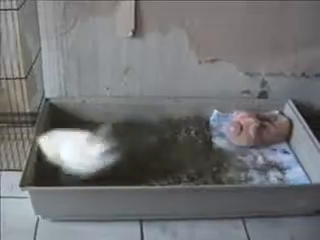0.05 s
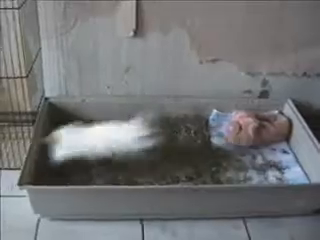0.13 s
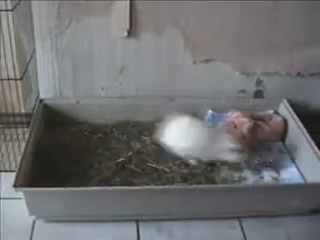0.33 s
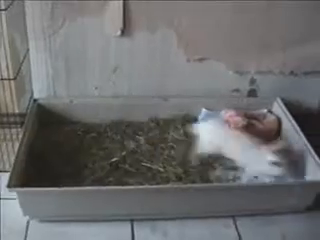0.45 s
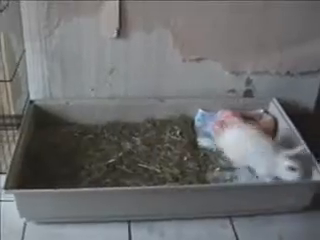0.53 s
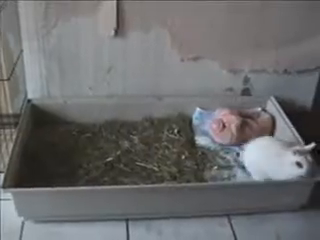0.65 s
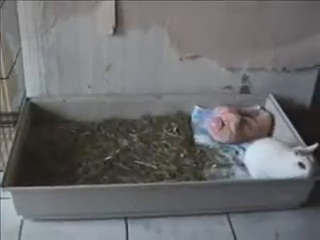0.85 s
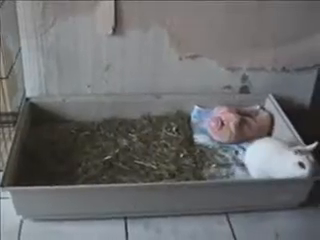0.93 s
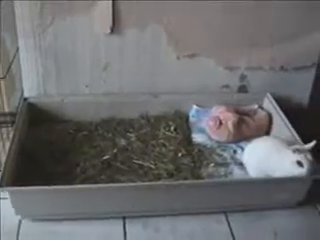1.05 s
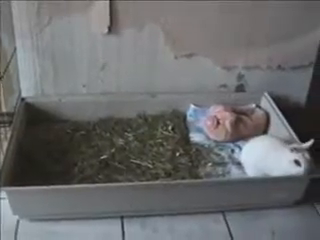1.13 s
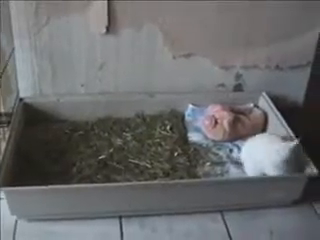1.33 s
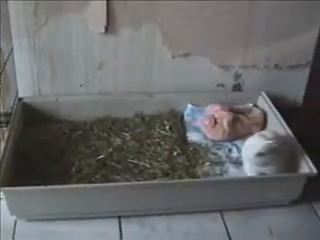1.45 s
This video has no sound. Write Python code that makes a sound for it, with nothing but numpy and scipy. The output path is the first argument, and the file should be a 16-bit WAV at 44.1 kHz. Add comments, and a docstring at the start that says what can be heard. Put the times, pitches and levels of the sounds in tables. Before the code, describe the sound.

A rabbit's loud hollow thump on a plastic tray, amid pattering paws and rustling hay

```python
"""Paws patter on a plastic cage tray and hay rustles, over an appliance hum and a faint hiss.
Stalks snap as a rabbit dashes, leaps and lands with one loud hollow thump; then it settles.
Thump and paws are decaying sine modes of the tray; hay, snaps, clatter and a claw squeak are
coloured noise, partly ticks. Hum is wavering sines. A small tiled room adds a noise tail."""
import sys
import numpy as np
from scipy import signal
from scipy.fft import rfft, irfft, next_fast_len
from scipy.io import wavfile
from scipy.ndimage import map_coordinates

SR = 44100
rng = np.random.default_rng(int(sys.argv[2]) if len(sys.argv) > 2 else 0)


def wrap_up_sound(samples):
    """Save the sound to the file named by the first command line argument, as 16-bit audio."""
    columns = np.atleast_2d(samples).T
    # keep every value between -1 and 1, then stretch to whole-number steps
    tamed = np.clip(columns, -1, 1)
    steps = np.round(tamed * 32767).astype(np.int16)
    wavfile.write(sys.argv[1], SR, steps)


N = 66150
T = np.arange(N) / SR
STALKS_PER_S = 1500  # mean tick rate

# Resonant modes of the plastic tray. Each row: frequency in Hz, relative level in dB, t60 in s,
# swell time constant after a heavy blow in s.
TRAY_MODES = [(78.5, -17.5, 0.2, 0.014), (109, -20.5, 0.33, 0.0017), (150.7, -13.5, 0.29, 0.0037),
              (185, -11.5, 0.22, 0.0022), (229.3, -0.5, 0.15, 0.0086), (268.3, 0, 0.23, 0.0099),
              (346.6, -14.5, 0.22, 0.00067), (424.7, -15, 0.36, 0.0048), (443, -20, 0.28, 0.0023),
              (483, -11.5, 0.14, 0.0055), (573.5, -4, 0.071, 0.0011), (671, -19.5, .17, .002),
              (729, -33, 0.43, .002), (1137, -25, 0.15, 0.0029)]


def amp(db):
    """Decibels to gain."""
    return 10 ** (np.asarray(db) / 20)


def unit(x):
    """Scale to rms 1."""
    return x / np.sqrt(np.mean(x ** 2) + 1e-20)


def along(points, hz):
    """Interpolate (Hz, value) points on a log frequency axis."""
    f, v = np.transpose(points)
    return np.interp(np.log(hz + 1), np.log(f + 1), v)


def filtered(x, response):
    """Multiply the spectrum of x by a response of frequency."""
    m = next_fast_len(N + SR // 2)
    return irfft(rfft(x, m) * response(np.fft.rfftfreq(m, 1 / SR)), m)[..., :N]


def spread(pair):
    """Mix two unrelated signals into left and right with a set correlation per frequency."""
    # Stereo likeness. Each row: frequency in Hz, left-right correlation (0 to 1).
    likeness = [(30, 0.77), (130, 1), (500, 0.81), (1000, 0.69), (2500, 0.65), (8000, 0.69), (15000, 0.7)]

    def mid_side_gains(hz):
        angle = np.arccos(np.clip(along(likeness, hz), 0, .998)) / 2
        return np.array([np.cos(angle), np.sin(angle)])

    mid, side = filtered(pair, mid_side_gains)
    return np.array([mid + side, mid - side])


def noise(colour, grain_share=0):
    """Coloured stereo noise of rms 1, a share of its power in single random ticks."""
    ticks = unit(rng.standard_normal((2, N)) * (rng.random(N) < STALKS_PER_S / SR))
    share = np.clip(grain_share, 0, 1)
    pair = np.sqrt(share) * ticks + np.sqrt(1 - share) * rng.standard_normal((2, N))
    return unit(filtered(spread(pair), lambda hz: amp(along(colour, hz))))


def fade(start_s, t60_s, rise_s):
    """Exponential rise times exponential decay, silent before the start."""
    t = np.maximum(T - start_s, 0)
    return (1 - np.exp(-t / rise_s)) * np.exp(-np.log(1000) * t / t60_s)


def bursts(rows, colour, rise_s, grain_share):
    """Decaying bursts of noise from rows of start, level and t60."""
    envelope = sum(amp(db) * fade(s, t60, rise_s) for s, db, t60 in rows)
    return noise(colour, grain_share) * envelope


def background():
    """Appliance hum of phase-wavering sines over the room's wide hiss."""
    # Hum partials. Each row: frequency in Hz, rms level in dB.
    hum_partials = [(119, -60.5), (220.7, -62), (696.5, -50.5), (1265, -69), (1393, -65.5), (2815, -69),
                    (3273, -77), (3957, -91)]
    # Hiss colour. Each row: frequency in Hz, relative level in dB.
    air_colour = [(20, -13), (70, -9), (119, -10), (166, -9.5), (219, -2), (350, -10), (600, -8),
                  (900, -10.5), (1250, -12.5), (1700, -15), (2400, -17), (3000, -16), (4200, -23),
                  (5400, -25.5), (6000, -21), (6800, -21), (7500, -28.5), (11000, -33), (12000, -36),
                  (15500, -43)]
    waver_rad, waver_points_per_s = 0.1, 8
    right_db, right_lead_s = 0.4, 0.000082  # right up and left down by right_db
    air_db, air_side_db = -52.5, 8  # side boost widens the hiss
    sides = np.array([[-1], [1]])
    hum = np.zeros((2, N))
    for hz, db in hum_partials:
        waver = map_coordinates(rng.standard_normal(40), [T * waver_points_per_s], mode="mirror")
        phase = 2 * np.pi * (hz * T + rng.random()) + waver_rad * waver
        hum += amp(db) * np.sqrt(2) * np.sin(phase + sides * np.pi * hz * right_lead_s)
    air = noise(air_colour)
    mid = air.mean(0)
    air = mid + amp(air_side_db) * (air - mid)
    return hum * amp(sides * right_db) + amp(air_db) * air


def hay():
    """Stalks rustle with the rabbit's movement; fur and hay scuff along the tray."""
    # Rustle effort over time. Each row: time in s, level in dB.
    effort_points = [(0, -51.5), (.022, -43), (.06, -46), (.08, -43.5), (.104, -46.5), (.135, -41),
                     (.175, -45), (.214, -47), (.23, -33.5), (.27, -42), (.31, -42), (.39, -49),
                     (.399, -43.5), (.53, -46.5), (.585, -56), (.67, -51), (.74, -60), (.95, -65),
                     (1.5, -69.5)]
    # Rustle colour. Each row: frequency in Hz, relative level in dB.
    rustle_colour = [(200, 5.5), (900, 5), (2500, 1), (5000, -0.5), (8200, -1.5), (11000, -3.5),
                     (15000, -5)]
    # Scuff colour. Each row: frequency in Hz, relative level in dB.
    scuff_colour = [(25, -29), (80, -10.5), (160, 5), (300, -1.5), (600, -5.5), (1000, -13), (3000, -43)]
    stalk_share, scuff_db = 0.31, 1  # scuff level relative to the rustle
    effort = amp(np.interp(T, *np.transpose(effort_points)))
    return effort * (noise(rustle_colour, stalk_share) + amp(scuff_db) * noise(scuff_colour))


def paws():
    """Each paw stirs the tray modes that its spot favours and damps them as it rests."""
    # Paw steps. Each row: start in s, level in dB, favoured pitch in Hz.
    steps = [(.009, -27.5, 165), (.029, -30.5, 179), (.038, -33.5, 454), (.061, -33, 690),
             (.088, -31.5, 200), (.115, -27, 633), (.166, -36, 155), (.287, -21, 440), (.366, -37, 330),
             (.452, -21.5, 507), (.481, -36, 182), (.495, -42, 620), (.54, -35.5, 450), (.602, -41, 160),
             (.735, -34, 171), (0.766, -43, 255), (0.801, -44, 164), (0.819, -41.5, 180)]
    width_octaves, ring_share = 0.48, 0.48  # ring_share: part of each mode's t60 left
    scatter_db, build_s = 2, .002
    out = np.zeros(N)
    mode_hz, mode_db, mode_t60_s, _ = np.transpose(TRAY_MODES)
    for start_s, level_db, centre_hz in steps:
        favour = np.exp(-(np.log2(mode_hz / centre_hz) / width_octaves) ** 2)
        # mode levels count at half their dB
        weight = favour * amp(mode_db / 2 + rng.normal(0, scatter_db, len(mode_hz)))
        ring = sum(w * fade(start_s, ring_share * t60, build_s) * np.sin(2 * np.pi * hz * (T - start_s))
                   for hz, w, t60 in zip(mode_hz, weight, mode_t60_s))
        out += amp(level_db) * ring / np.linalg.norm(weight)
    return out


def snaps():
    """Stalks crushed under foot: short bright bursts, partly ticks."""
    # Each row: start in s, level in dB, t60 in s.
    crushes = [(.0685, -35.5, 0.056), (.2305, -30.5, 0.057), (.2355, -57, 0.01), (.2822, -25.5, 0.023),
               (.29, -40, 0.014)]
    # Each row: frequency in Hz, relative level in dB.
    snap_colour = [(500, -25), (2500, -7), (6500, 1), (10000, -3.5), (15000, -6.5)]
    return bursts(crushes, snap_colour, rise_s=0.00089, grain_share=.3)


def landing():
    """The whole body drops on the tray: every mode rings, swelling at its own pace."""
    start_s, level_db = .2314, -4
    thump = np.zeros(N)
    for k, (hz, db, t60_s, swell_s) in enumerate(TRAY_MODES):
        sign = (-1) ** k
        thump += sign * amp(db) * fade(start_s, t60_s, swell_s) * np.sin(2 * np.pi * hz * (T - start_s))
    return amp(level_db) * thump


def clatters():
    """The tray's walls clatter: decaying noise with many ticks."""
    # Each row: start in s, level in dB, t60 in s.
    rattles = [(.234, -22.5, 0.22), (.281, -29.5, 0.29), (.4515, -33, 0.051), (.48, -41.5, 0.4),
               (.733, -53.5, 0.9)]
    # Each row: frequency in Hz, relative level in dB.
    clatter_colour = [(150, -10.5), (400, 2.5), (700, 1), (860, -5), (1130, -3), (1500, -8), (2600, -11.5),
                      (4000, -20), (15000, -81)]
    return bursts(rattles, clatter_colour, rise_s=0.00041, grain_share=0.43)


def squeaks():
    """A claw slips on the smooth plastic: tick-free noise peaked in the treble."""
    # Each row: start in s, level in dB, t60 in s.
    slips = [(.399, -44, .25)]
    # Each row: frequency in Hz, relative level in dB.
    squeak_colour = [(4000, -27), (7900, -26), (8200, -10), (8500, -25), (15000, -32)]
    return bursts(slips, squeak_colour, rise_s=0.0019, grain_share=0)


def room(x):
    """Diffuse answer of the walls: convolution with a noise tail whose treble dies first."""
    # Reverberation. Each row: frequency in Hz, t60 in s.
    reverb_t60 = [(100, 0.56), (500, 0.5), (2000, 0.36), (10000, 0.32)]
    build_s = 0.0097
    hz, t, z = signal.stft(rng.standard_normal((2, SR // 2)), SR, nperseg=256)
    decay = np.exp(-np.log(1000) * t / along(reverb_t60, hz)[:, None])
    build = 1 - np.exp(-t / build_s)
    tail = signal.istft(z * decay * build, SR, nperseg=256)[1]
    tail = spread(tail / np.linalg.norm(tail[0]))
    return signal.fftconvolve(x[None], tail, axes=1)[:, :N]


def scene():
    """Tray, hay and hum in the room, slightly louder on the right."""
    room_db, thump_room_db = -10, -18.5
    thump = landing()
    small = paws() + hay() + clatters() + snaps() + squeaks()
    wet = room(amp(thump_room_db) * thump + amp(room_db) * small.mean(0))
    return (thump + small + wet + background()) * amp([[-.3], [.3]])


def record(dry):
    """Steep low-pass: the treble ends at the band limit."""
    top_hz = 15600
    return filtered(dry, lambda hz: 1 / np.sqrt(1 + (hz / top_hz) ** 400))


dry = scene()
out = record(dry)
wrap_up_sound(out)
```